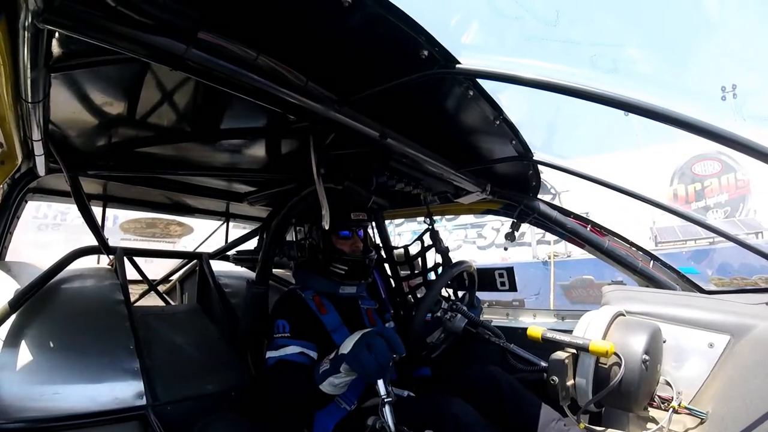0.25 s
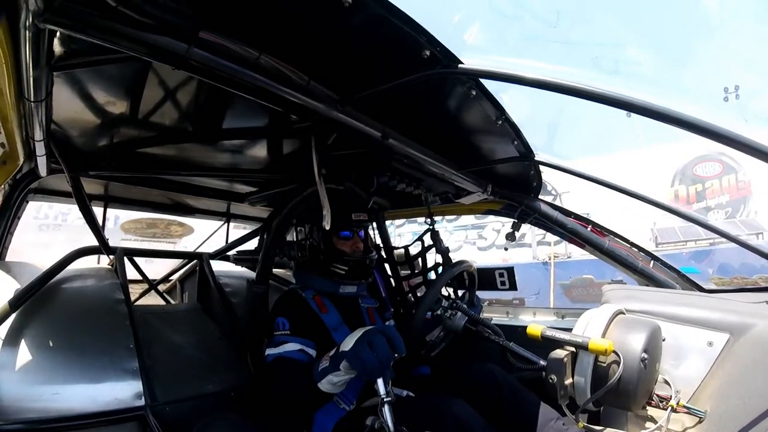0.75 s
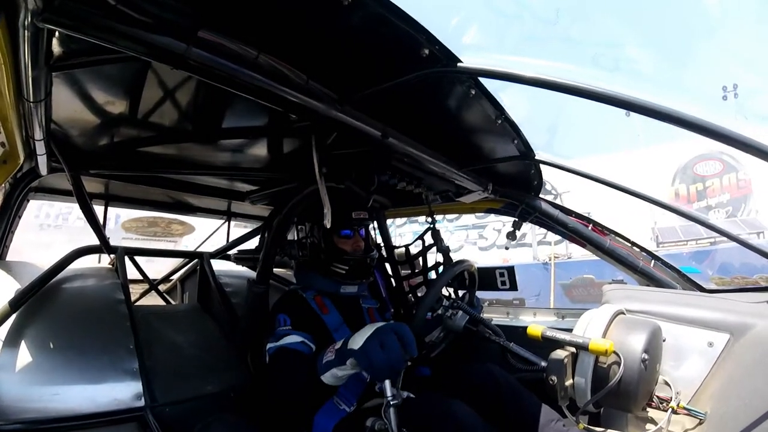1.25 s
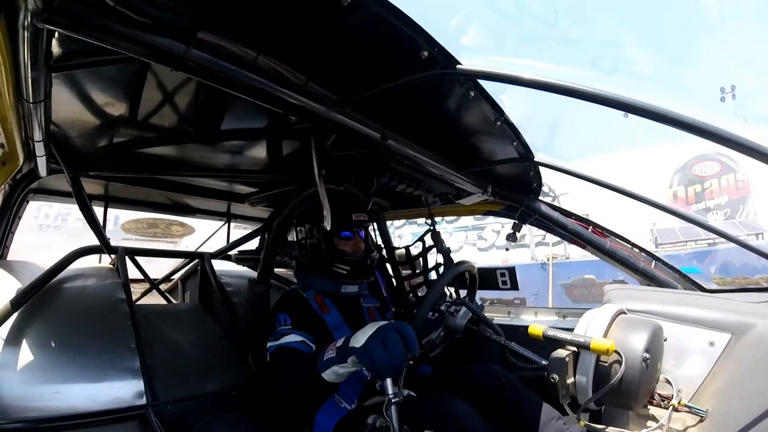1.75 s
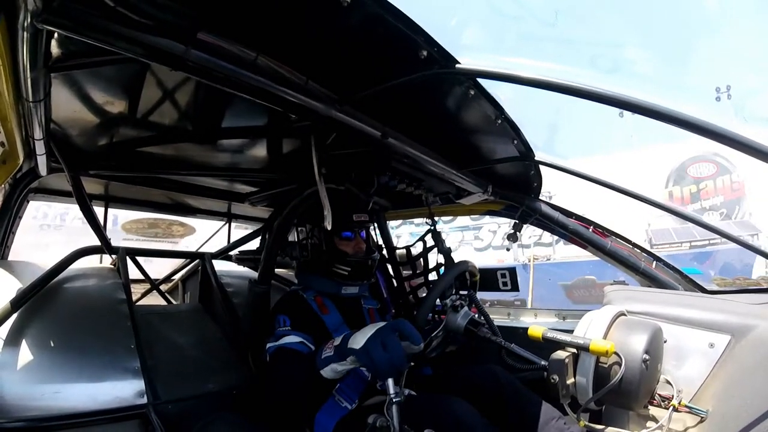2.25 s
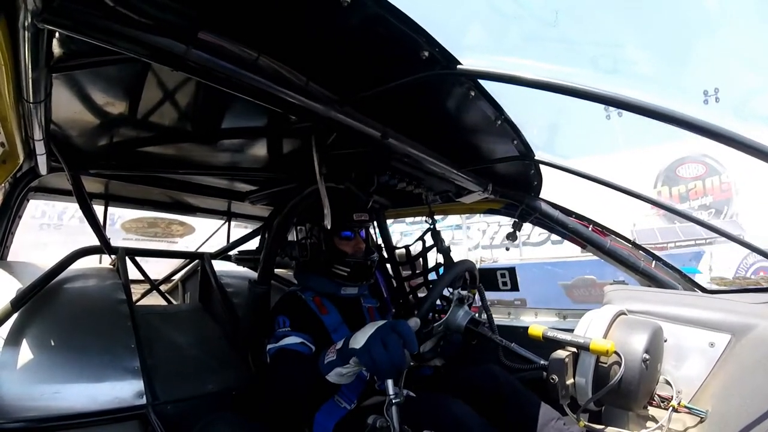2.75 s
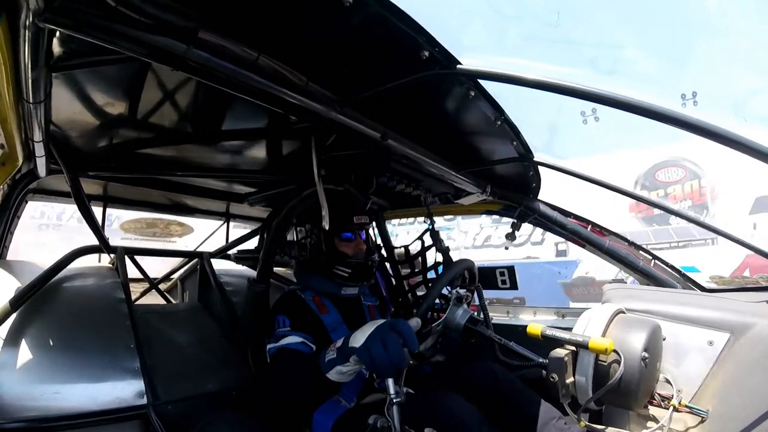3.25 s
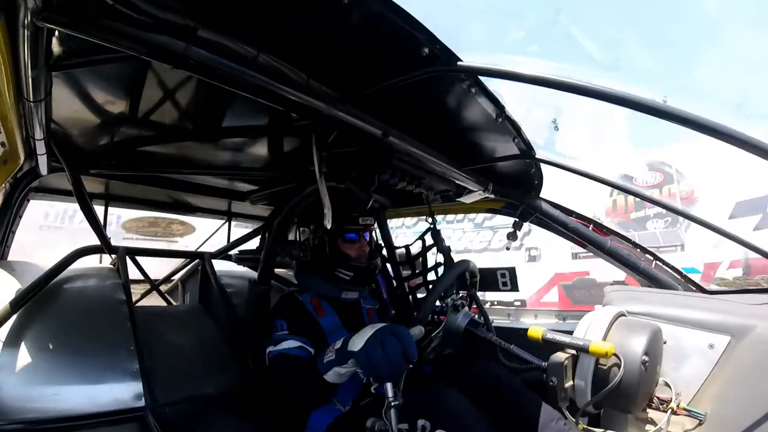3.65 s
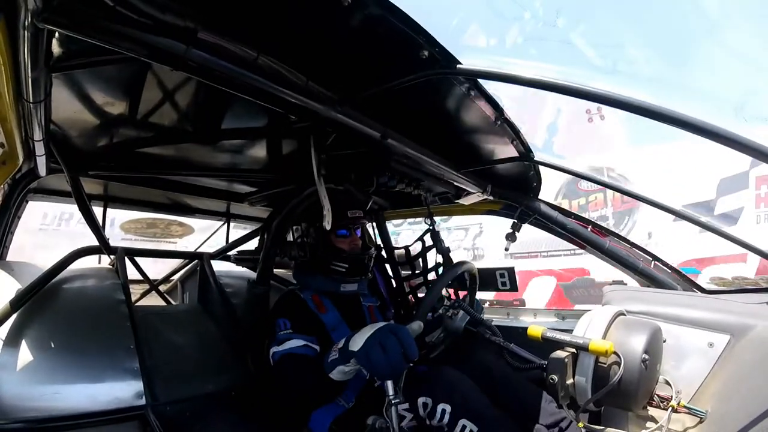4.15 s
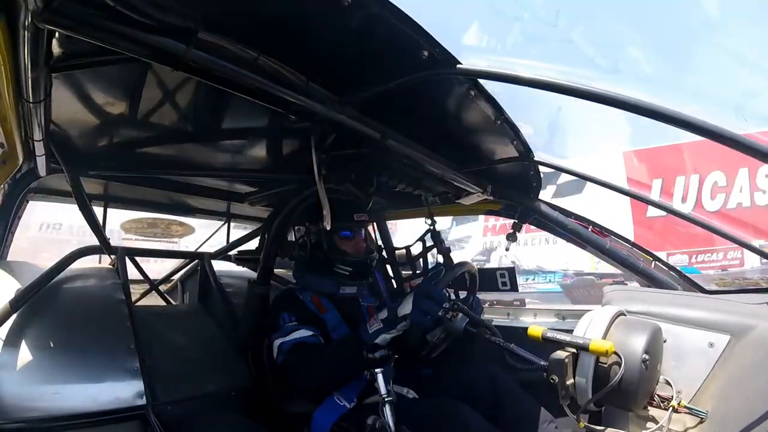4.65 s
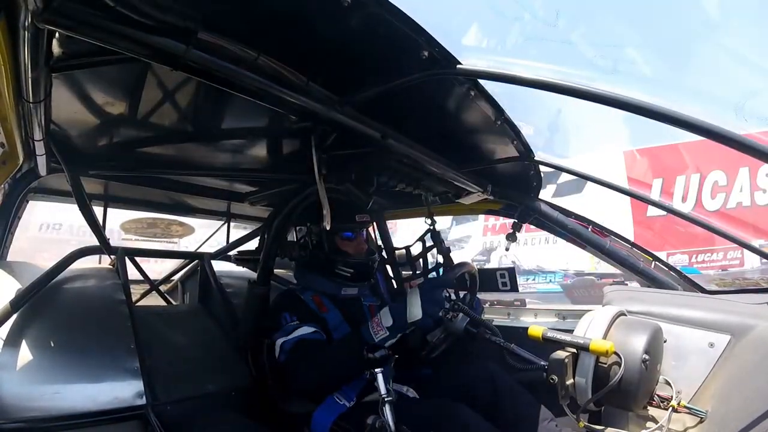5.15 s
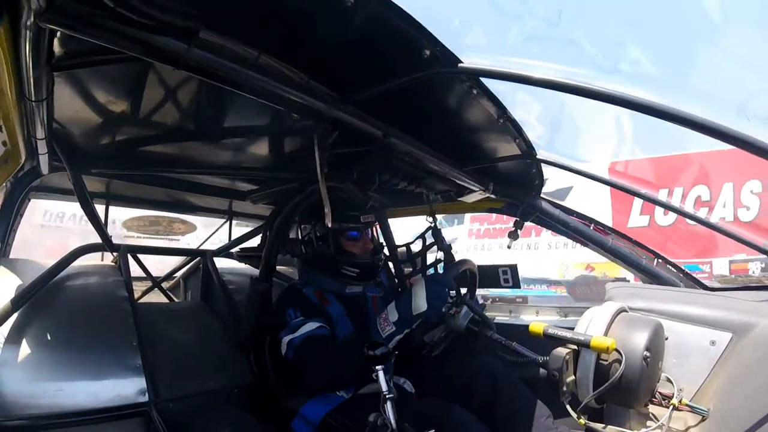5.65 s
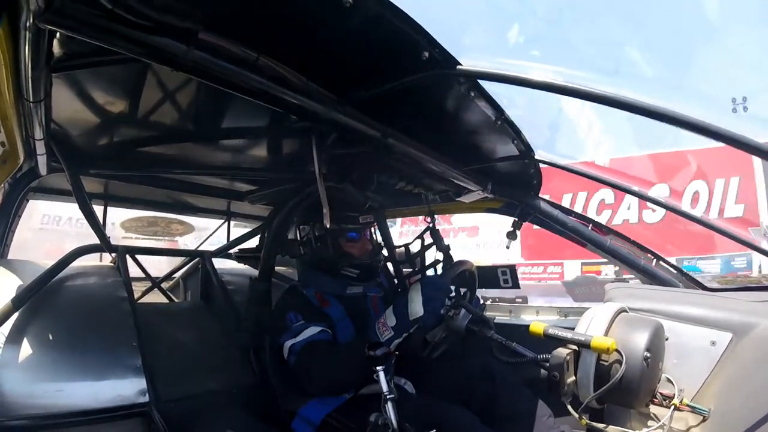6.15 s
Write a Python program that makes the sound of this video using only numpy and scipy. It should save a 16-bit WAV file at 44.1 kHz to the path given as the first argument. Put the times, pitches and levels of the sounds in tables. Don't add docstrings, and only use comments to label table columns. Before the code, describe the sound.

Raw, booming V8 engine climbs and drops in pitch in a metal cabin, falls to popping idle, then cuts to a second full-throttle surge.

```python
import sys
import numpy as np
from scipy import signal
from scipy.fft import rfft, irfft
from scipy.io import wavfile
from scipy.ndimage import uniform_filter1d

SR = 44100
rng = np.random.default_rng(int(sys.argv[2]) if len(sys.argv) > 2 else 0)


def ratio(d):
    e = np.asarray(d, float) / 20
    return 10 ** e


def put_to_file(sound):
    columns = np.atleast_2d(sound).T
    safe = np.clip(columns, -1, 1)
    whole_steps = np.round(safe * 32767)
    wavfile.write(sys.argv[1], SR, whole_steps.astype(np.int16))


N = 282240
CHANGE_S = 4.4362
LIFT_S, COAST_S, IDLE_HZ = 3.64, 0.28, 14.9


def level(x, db):
    return x * ratio(db) / np.sqrt(np.mean(x ** 2))


def by_speed(hz, points):
    hz_points, db_points = np.transpose(points)
    return np.interp(np.log(hz), np.log(hz_points), db_points)


def colour(x, points, lifts=()):
    hz = np.fft.rfftfreq(8192, 1 / SR) + 1
    db = by_speed(hz, points)
    db = db + sum(lift / (1 + (2 * (hz - f) / width) ** 2) for f, width, lift in lifts)
    cepstrum = irfft(np.log(ratio(db)))
    cepstrum[1:4096] *= 2
    cepstrum[4097:] = 0
    return signal.fftconvolve(x, irfft(np.exp(rfft(cepstrum))))[:N]


def walk(rate):
    k = int(SR / rate)
    held = np.repeat(rng.standard_normal(N // k + 1), k)
    return 1.316 * uniform_filter1d(uniform_filter1d(held, k), k)[:N]


def pulses(at, size):
    out, whole = np.zeros(N + 2), at.astype(int)
    np.add.at(out, whole, size * (1 - at + whole))
    np.add.at(out, whole + 1, size * (at - whole))
    return out[:N]


def steady(x, span_s=0.082):
    return x / np.sqrt(uniform_filter1d(x ** 2, int(span_s * SR)) + 1e-9)


def table(rows):
    s, *columns = np.transpose(rows)
    return [uniform_filter1d(np.interp(np.arange(N) / SR, s, c), size=128) for c in columns]


def gas(puffs, points, lifts, puff_s, depth, flicker_db):
    gate = signal.lfilter([1], [1, -np.exp(-1 / (puff_s * SR))], puffs)
    gate = steady(gate) * depth + 1
    noise = colour(gate * rng.standard_normal(N), points, lifts)
    return steady(noise, 0.16) * ratio(flicker_db * walk(24))


# hz, level_db
SURROUNDINGS = [(210, -35), (350, -6), (690, -3.5), (970, -16.5), (2580, -14), (5440, -32), (6410, -25),
                (9000, -33), (11700, -64.5), (19800, -120)]


def surroundings():
    return level(colour(rng.standard_normal(N), SURROUNDINGS), -47.8)


# hz, level_db
RUMBLE = [(15, -20), (30, -5), (50, 5), (90, 0.5), (200, -3.5), (400, -32.5), (1000, -97.5)]


def rumble(again):
    calm_db = -8
    return level(colour(rng.standard_normal(N), RUMBLE), -28) * ratio(calm_db * again)


# hz, level_db
SCRUB = [(600, -75), (1500, -28), (2800, 5.5), (3700, 4.5), (4500, -1.5), (6000, -43.5), (9000, -79)]


def tyre_scrub(t, puffs):
    corners_s = np.cumsum([3.3, 0.17, 0.11, 0.33])
    skid_db = -33.5 + np.interp(t, corners_s, [-40, 0, 0, -40])
    return ratio(skid_db) * gas(puffs, SCRUB, (), puff_s=0.002, depth=0.1, flicker_db=2.0)


# hz, level_db
HISS = [(710, -22), (1200, -12), (1580, 1), (1760, -2.5), (2100, 2.5), (3450, -6), (6000, -18.5),
        (7800, -44.5), (13200, -120)]


def tyre_hiss(t, hiss_db, puffs):
    bite_s, bite_span_s, bite_db = 3.545, 0.04, 5
    flare_db = bite_db * np.exp(-((t - bite_s) / bite_span_s) ** 2)
    return ratio(hiss_db + flare_db + 1.25) * gas(puffs, HISS, (), puff_s=0.0059, depth=0.1, flicker_db=0.68)


# hz, level_db
RATTLE = [(1000, -72), (3000, -21.5), (4200, -7), (5200, -7.5), (6000, -11), (7200, -14), (9000, -22),
          (10200, -29.5), (11700, -33), (12300, -74)]
# hz, width_hz, lift_db
PORTS = [(6410, 540, 14), (11060, 1300, 10)]


def rattle(rattle_db, puffs):
    return ratio(rattle_db + 3.0) * gas(puffs, RATTLE, PORTS, puff_s=0.0015, depth=0.2, flicker_db=0.0)


# start_s, peak_db, thump_hz, crackle_db
POPS = [(4.001, -20, 65, -32), (4.063, -13, 69, -51), (4.111, -12, 66, -52), (4.172, -11.5, 114, -44),
        (4.224, -20, 75.6, -48), (4.299, -9, 74, -44), (4.326, -10.5, 132, -44), (4.373, -8, 87, -40),
        (4.451, -3, 119, -44), (4.475, -1.5, 120, -42), (4.496, -2, 114.4, -48)]


def pops():
    out, t = np.zeros(N), np.arange(int(0.08 * SR)) / SR
    hiss = level(colour(rng.standard_normal(N), RATTLE, PORTS), 0)
    swell = t / 0.011 * np.exp(1 - t / 0.0078)
    for s, db, hz, crackle_db in POPS:
        i = int(s * SR)
        thump = ratio(db) * np.sin(2 * np.pi * hz * t)
        crackle = ratio(db + crackle_db) * hiss[i:i + len(t)]
        out[i:i + len(t)] += swell * (thump + crackle)
    return out


# hz, level_db
FRAME = [(25, -54), (44, -24), (62, -22.5), (80, -29), (110, -21.5), (160, -37), (250, -22), (305, -19),
         (370, -49)]
# multiple of the cycle, first_pull_db, second_pull_db
SHAFTS = [
    (1, 1.2, -22),
    (2, 1, -5),
    (4, 1, -1),
    (6, 0.5, -4),
]
# hz, width_hz, lift_db
WHINE_RING = (1492, 27, 16.3)


def shake(t, hz, load_db, again):
    clutch_s, slip_s, clutch_db = 1.415, 0.085, -18
    follows = 0.27
    effort = follows * (load_db + 13) + clutch_db * np.exp(-((t - clutch_s) / slip_s) ** 6)
    levels_db = []
    for k, (_, first_db, second_db) in zip((1, 2, 4, 6), SHAFTS):
        unbalance_db = np.where(again, second_db, first_db)
        levels_db.append(by_speed(k * hz, FRAME) + unbalance_db + effort + 2.0 * walk(8.9))
    ring, width, lift = WHINE_RING
    levels_db.append(-47 + effort + lift / (1 + (2 * (31 * hz - ring) / width) ** 2))
    return levels_db


def frame(turns, levels_db):
    out = np.zeros(N)
    for k, db in zip((1, 2, 4, 6, 31), levels_db):
        tone = np.sin(2 * np.pi * (k * turns + 0.02 * walk(6)))
        out += ratio(db + 2 + 1.5 * walk(12)) * tone
    return out


# start_s, engine cycles per s
REVS = [(0, 39.3), (.4, 42.4), (.73, 44), (.83, 46.9), (.99, 55.3), (1.17, 61.3), (1.28, 63.4),
        (1.332, 62.6), (1.352, 51.8), (1.47, 51.4), (1.72, 53.6), (1.84, 53.4), (2.28, 50), (2.54, 49.3),
        (2.94, 50.3), (3.21, 40), (3.43, 37), (3.64, 37.7)]
# start_s, engine cycles per s
REVS_AGAIN = [
    (4.6, 24.2),
    (4.71, 27.2),
    (5.22, 29.9),
    (5.416, 30.4),
    (5.59, 41.8),
    (5.694, 45.7),
    (5.842, 48.3),
    (5.994, 48.6),
    (6.4, 47.7),
]


def revs(t):
    coast = (1 - np.exp(-((t - LIFT_S) / COAST_S) ** 2)) * (t > LIFT_S) * (t < CHANGE_S)
    first = table(REVS)[0]
    second = table([(CHANGE_S, IDLE_HZ)] + REVS_AGAIN)[0]
    return np.where(t < CHANGE_S, first + coast * (IDLE_HZ - first), second), coast


def misfire(hz, coast, again):
    ragged_db, climb_db, fall_db, lope_db = -15.5, 4, 9, 13
    even_db, cleaner_db = -7, -5
    change = signal.lfilter([1 / 5000], [1, 1 / 5000 - 1], np.gradient(np.log(hz)) * SR)
    db = ragged_db + climb_db * np.tanh(np.maximum(change, 0))
    db = db + fall_db * np.tanh(np.maximum(-change, 0)) * (1 - coast) + lope_db * coast
    return db + again * (even_db + cleaner_db * np.log2(np.maximum(hz / 30, 1)))


BANK = [1, -1, -1, 1, -1, 1, 1, -1]
MISMATCH = [-1.87, 0.27, 0.48, -1.89, 0.85, -1.95, -1.97, 0.43]
HEADERS_MS = [0.099, 0.56, 0.15, 0.28, 0.1, 0.031, 0.26, 0.11]


def exhaust(turns, both_db, misfire_db):
    late, mismatch_db = 0.005, -6
    count = np.arange(1, int(8 * turns[-1]))
    chance = rng.standard_normal((4000, 2))[count].T
    cylinder = count % 8
    side = np.array(BANK)[cylinder]
    at = np.interp((count + late * chance[0]) / 8, turns, np.arange(N))
    at = np.clip(at + np.array(HEADERS_MS)[cylinder] * SR / 1000, 0, N - 1)
    i = at.astype(int)
    size = side + ratio(both_db[i]) + ratio(mismatch_db) * np.array(MISMATCH)[cylinder]
    size = size + ratio(misfire_db[i]) * chance[1]
    beats = pulses(at, size)
    puffs = pulses(at, ratio(1.2 * chance[1]) * (1 + 0.18 * side))
    return beats, puffs


# hz, level_db
ROAR = [(180, -21.5), (300, -9), (351, -22), (444, -12), (668, -24), (1290, -22), (2200, -50.5),
        (2860, -59.5), (4840, -120)]
# hz, level_db
BARK = [(250, -34), (420, -17.5), (520, 7), (600, -2), (800, 0.5), (1000, -6), (1500, -10), (2200, -17.5),
        (3500, -22.5), (6000, -85)]
# hz, width_hz, lift_db
PANELS = [(306, 18, 7.5), (340, 29, 2.5), (398.2, 26, -3.5), (487, 11, 5), (683, 64, 12.5), (768, 16, 8.5),
          (1068, 35, 6), (1490, 42, 4.5)]


def roar_and_bark(roar_db, beats, puffs, coast, again):
    bark_db = -3 - 2 * coast + 5 * again
    roar = gas(puffs, ROAR, PANELS, puff_s=0.0038, depth=0.15, flicker_db=1.76)
    bark = ratio(bark_db) * steady(colour(beats, BARK, PANELS))
    return ratio(roar_db + 3.0) * (roar + bark) / np.hypot(1, ratio(bark_db))


# hz, level_db
PIPE = [(20, -50), (45, -15), (75, -1.5), (120, 0), (160, -1.5), (190, -1.5), (215, -11.5), (300, -33.5),
        (500, -96.5)]
# engine cycles per s, level_db
THROB = [(15, -8), (22, 4.5), (30, -4.5), (40, -3), (50, -4.5), (56, -14.5), (63, -14)]


def pipe_throb(t, hz, coast, again, boom_db, beats):
    blip_db, blip_s = 12, 0.061
    throb_db = boom_db + by_speed(hz, THROB) + 10 * np.sqrt(coast)
    throb_db += again * blip_db * np.exp(-np.abs(t - CHANGE_S) / blip_s)
    return ratio(throb_db + 0.5) * steady(colour(beats, PIPE))


# hz, level_db
CABIN = [(80, -33), (170, -17), (205, 3), (240, 2), (320, -6.5), (400, -10.5), (450, -23), (600, -46.5),
         (1500, -70)]


def cabin_boom(boom_db, beats):
    return ratio(boom_db - 1.0) * steady(colour(beats, CABIN, PANELS))


# start_s, pressure_db, gas_flow_db, both_banks_in_step_db
LOAD = [(0, -14, -35, -4.5), (.7, -13.5, -34.5, -4), (.82, -11, -29.5, -4.5), (1.0, -12.5, -29, 8),
        (1.32, -10, -31.5, 6), (1.345, -13, -32, 1.5), (1.6, -15, -34, 8), (1.9, -13.5, -33.5, 7),
        (2.28, -16, -33, -3.5), (2.98, -14.5, -32.5, -2), (3.13, -13, -37.5, -5.5),
        (3.32, -11.5, -40.5, -3), (3.53, -10.5, -34, 0), (3.68, -13.5, -38.5, -4.5), (3.74, -28.5, -50, -4),
        (3.88, -42.5, -68.5, -1), (4.27, -36, -60.5, -3.5), (4.434, -32, -57, 6)]
# start_s, pressure_db, gas_flow_db, both_banks_in_step_db
LOAD_AGAIN = [
    (4.438, -22.5, -42, -9),
    (4.549, -15.5, -40.5, -5),
    (5.0, -12.5, -42, -3.5),
    (5.2, -10.5, -38.5, -1),
    (5.44, -12.5, -38.5, 0),
    (5.58, -11.5, -32, -4),
    (5.7, -10, -32, -1),
    (5.789, -12, -31, -3.5),
    (6.4, -11.5, -29, -6),
]
# level_at_full_flow_db, db gained per db of flow
GAS = [
    (-24.5, 0.86),
    (-32, 1.026),
    (-41, 0.65),
]


def scene():
    t = np.arange(N) / SR
    again = t >= CHANGE_S
    hz, coast = revs(t)
    boom_db, flow_db, both_db = table(LOAD + LOAD_AGAIN)
    full_flow_db = -32
    roar_db, hiss_db, rattle_db = (db + share * (flow_db - full_flow_db) for db, share in GAS)
    turns = np.cumsum(hz * (1 + 0.002 * walk(12))) / SR
    beats, puffs = exhaust(turns, both_db, misfire(hz, coast, again))
    out = surroundings() + rumble(again)
    out += tyre_scrub(t, puffs)
    out += tyre_hiss(t, hiss_db, puffs)
    out += rattle(rattle_db, puffs)
    out += pops()
    out += frame(turns, shake(t, hz, boom_db, again))
    out += roar_and_bark(roar_db, beats, puffs, coast, again)
    out += pipe_throb(t, hz, coast, again, boom_db, beats)
    out += cabin_boom(boom_db, beats)
    return out[None]


def thin(x):
    from_hz, under_db, floor_db = 7000, -2.2, -100
    hz, _, z = signal.stft(x, SR, window="cosine", nperseg=2048)
    bands = np.abs(z[:1024].reshape(128, 8, -1)) ** 2
    power = np.repeat(np.mean(bands, axis=1), 8, axis=0)
    usual = uniform_filter1d(power, size=9, axis=1)
    weak = (power < usual * ratio(2 * under_db)) | (power < ratio(2 * floor_db))
    z[:1024] *= ~(weak & (hz[:1024, None] > from_hz))
    return signal.istft(z, SR, window="cosine", nperseg=2048)[1][:N]


def top_cut(x):
    return signal.sosfilt(signal.butter(12, 12400, fs=SR, output="sos"), x)


def record(dry):
    x = 0.93 * np.tanh(dry / 0.93 + (dry / 0.93) ** 3 / 4)
    after = np.arange(N) / SR - CHANGE_S
    step = -0.16 * (after >= 0) * np.exp(-np.abs(after) / 0.002)
    mix = thin(x[0]) + step
    return top_cut(mix[None])


dry = scene()
out = record(dry)
put_to_file(out)
```